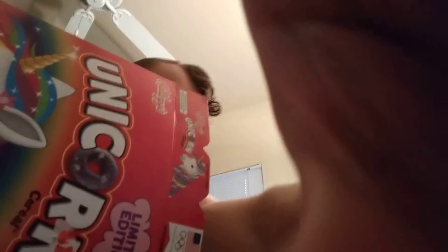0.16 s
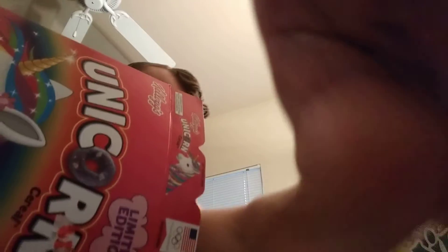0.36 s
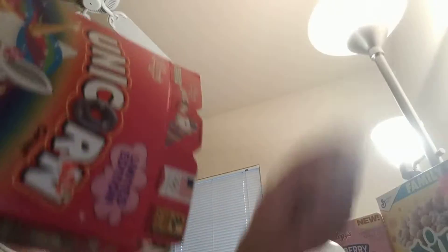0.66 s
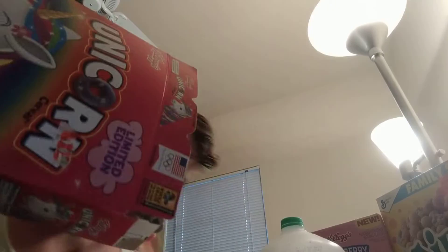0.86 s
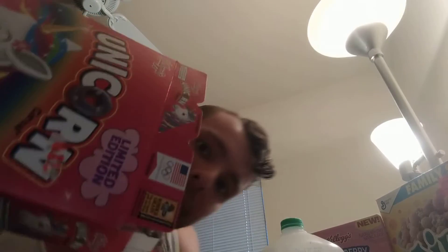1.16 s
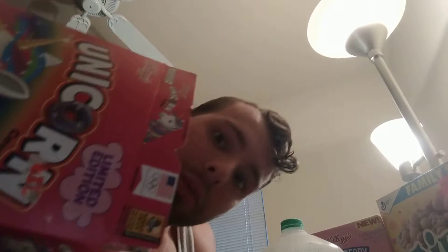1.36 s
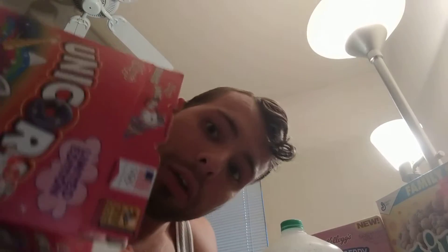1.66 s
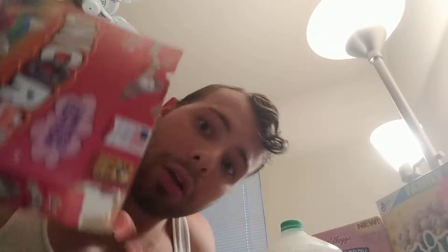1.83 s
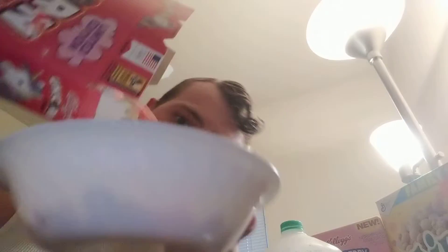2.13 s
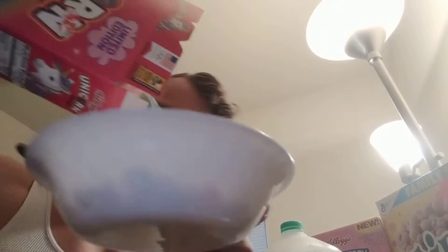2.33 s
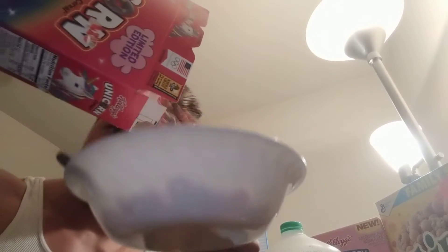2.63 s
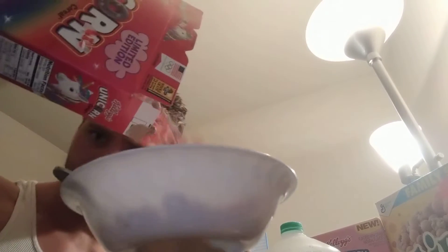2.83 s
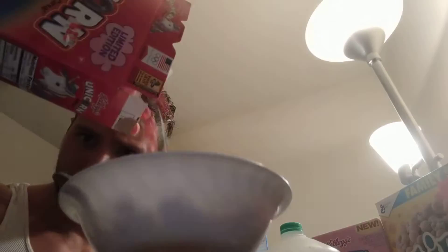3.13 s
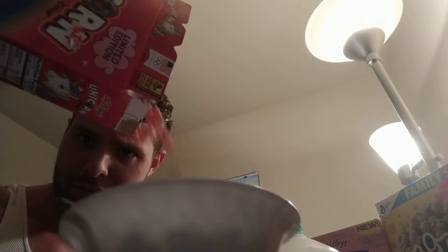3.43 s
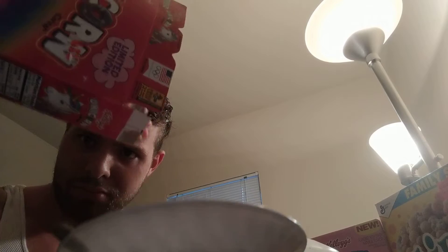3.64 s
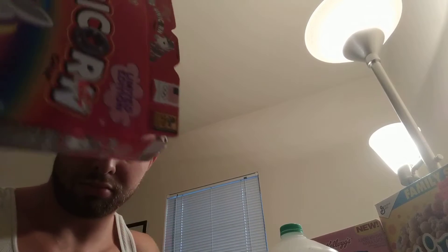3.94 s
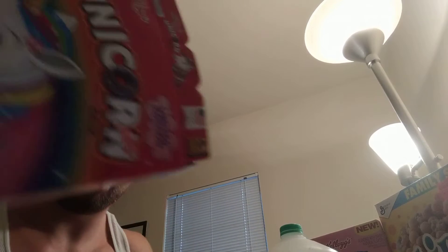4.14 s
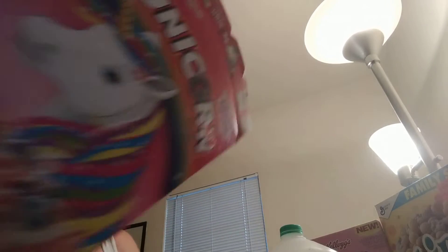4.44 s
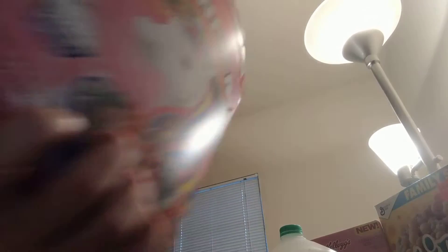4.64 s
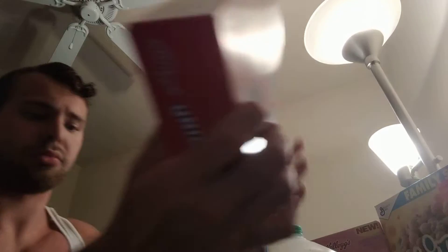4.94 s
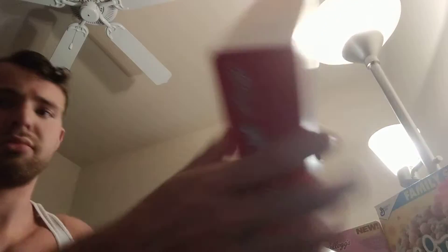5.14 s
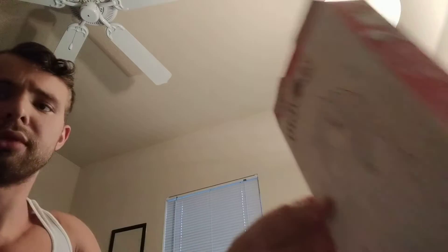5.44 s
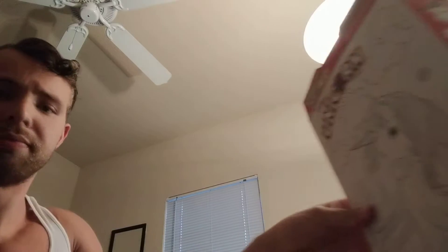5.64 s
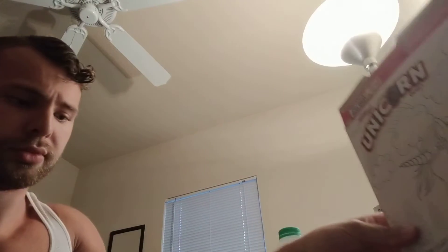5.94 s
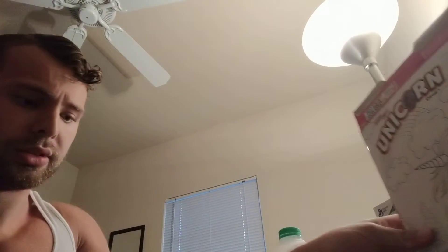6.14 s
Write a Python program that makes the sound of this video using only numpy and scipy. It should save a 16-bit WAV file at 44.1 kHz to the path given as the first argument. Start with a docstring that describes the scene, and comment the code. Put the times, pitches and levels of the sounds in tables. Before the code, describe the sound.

Close up in a small quiet room, dry cereal rings spill in bright, clinking clumps into a hard bowl. The bowl is picked up with a brief clatter of spoon and loose rings, then a second pour lands on the heap and thins out. The box hits the table with one sharp knock and a duller bump, fingers tap and rub the cardboard, and a last dull thump follows. Phone microphone.

```python
"""Clumps of dry ring cereal spill into a ringing bowl, then spoon and rings clatter as the bowl is picked up.
A stream pours onto the heap and thins out, the liner bag crinkles, and the box lands with one sharp knock and
two duller bumps while a hand slides over the cardboard. Cereal is many tiny impacts sent through ringing bodies;
knocks are decaying tones plus a noise crack; hands and sliding are shaped grains and noise.
A small room, quiet air and a faint hum surround it all, picked up by a phone."""
import sys
import numpy as np
from scipy import signal
from scipy.fft import rfft, irfft
from scipy.io import wavfile

SR = 44100
rng = np.random.default_rng(int(sys.argv[2]) if len(sys.argv) > 2 else 0)


def wrap_up_sound(samples):
    """Save the sound to the file named by the first command line argument, as 16-bit audio."""
    columns = np.atleast_2d(samples).T
    # keep every value between -1 and 1, then stretch to whole-number steps
    tamed = np.clip(columns, -1, 1)
    steps = np.round(tamed * 32767).astype(np.int16)
    wavfile.write(sys.argv[1], SR, steps)


N = 277521
TIME = np.arange(N) / SR

# Table levels are relative: the functions below add gains of their own.
# colour of the room air: (f/Hz, level/dB)
AIR_COLOUR = [(25, -7), (70, 1.5), (120, -9), (200, 0), (600, -26), (2000, -23), (8000, -11), (16000, -36)]
HUM_HZ, HUM_DB = 119, -64

# tips of the box that set the cereal sliding: (peak t/s, level/dB, rise t/s, fall t/s)
BOX_TIPS = [(.03, -38, 0.84, 0.6), (.66, -47, 0.18, .08), (1.37, -52.5, 0.28, 1.4),
            (1.68, -51.5, 0.61, 0.39), (2.8, -40, 1.3, 1.11), (3.6, -47, 1.5, 0.41),
            (4.21, -55, 0.12, 0.088)]
# strokes of a hand over the cardboard: (peak t/s, level/dB, rise t/s, fall t/s, hiss minus rub before gain level/dB)
HAND_STROKES = [(4.68, -44, 0.47, 0.33, -9), (4.86, -49, 0.41, 0.31, -8), (5.249, -35.5, 0.19, .15, -13.5),
                (5.6, -45.5, 0.27, 0.44, -10), (5.84, -36, 0.52, 0.54, -13.5),
                (6.0, -41.5, 0.53, 0.47, -4.5)]
SWELL_DB = 20  # each rise and fall time above spans this many dB
HISS_LAG_S = 0.011  # the dry hiss of skin trails the rub
# colours of sliding cereal, rubbing hand and hissing skin: (f/Hz, level/dB)
SLIDE_COLOUR = [(71, -11), (120, -5.5), (151, -13), (188, -7.5), (458, -2), (718, 3), (1260, -11.5),
                (1490, -3.5), (1900, -17.5), (2200, -15.5), (2860, -11), (4840, -120)]
RUB_COLOUR = [(59, -32), (100, -12), (135, -5), (282, -5.5), (440, 0), (516, -1), (732, -0.5), (872, -8),
              (1010, -7), (1570, -9), (2130, -21.5), (2540, -16.5), (4500, -25.5), (5850, -54),
              (9900, -120)]
HISS_COLOUR = [(2000, -19), (3200, 6), (4400, 3.5), (5500, 7), (7300, 6), (10000, 0), (12500, -5),
               (16000, -10)]

# fingers tapping and flexing the cardboard, and the bright crack of the box landing at 4.62 s: (t/s, level/dB,
# length t/s, brightness f/Hz)
CARDBOARD_TAPS = [(4.455, -41, 0.015, 2790), (4.596, -33.5, .005, 9600), (4.623, -29, 0.016, 1960),
                  (4.697, -29.5, 0.011, 1510), (4.754, -34.5, 0.005, 3240), (4.836, -40.5, 0.015, 900),
                  (4.88, -36.5, 0.0086, 1490), (4.955, -36.5, 0.014, 6600), (5.03, -38.5, 0.0036, 3600),
                  (5.089, -41, 0.0041, 8400), (5.192, -36, 0.011, 5870), (5.229, -36, 0.048, 2950),
                  (5.375, -38, 0.019, 2270), (5.442, -35.5, .006, 2980), (5.566, -35.5, 0.0019, 14000),
                  (5.772, -26, 0.0055, 2010), (6.012, -27, 0.019, 3630), (6.104, -34, .0013, 14000)]
# soft low thuds of handling: (t/s, level/dB, length t/s)
SOFT_THUDS = [(0.162, -43, 0.024), (.33, -48.5, 0.11), (1.379, -47, 0.13), (4.26, -51, 0.026),
              (4.701, -39.5, 0.14), (4.841, -40.5, 0.13), (5.83, -41, 0.043)]
# colours of the taps and thuds: (f/Hz, level/dB)
TAP_COLOUR = [(100, 5.5), (400, 15.5), (750, 15.5), (1500, 9.5), (2200, 1.5), (3600, 7.5), (7000, 6),
              (10000, 3), (16000, 4)]
THUD_COLOUR = [(25, -16), (65, -9.5), (120, -4.5), (200, -7), (400, -11), (1000, -49), (3000, -101)]

# the liner bag crinkles as the box is righted: (t/s, level/dB, length t/s)
LINER_CRINKLES = [(3.996, -56, .025), (4.122, -47.5, 0.032)]
# colour of the liner plastic: (f/Hz, level/dB)
LINER_COLOUR = [(1500, -8), (4000, 3), (8000, 2), (13000, -1), (16000, -10)]

# blows of the box on the table: (t/s, level/dB, contact brightness f/Hz, rebound delay t/s, rebound level/dB)
BOX_KNOCKS = [(4.481, -3.5, 11000, 0.016, -12.5), (4.62, -12.5, 356, 0.012, 4),
              (6.008, -4.5, 186, 0.049, -10)]
# ringing tones of box and table: (f/Hz, level/dB, time to fall 60 dB t/s)
TABLE_MODES = [(88, -32, 1), (113.2, -22.5, 0.58), (135, -16.5, 0.12), (190.2, -12, 0.27),
               (255, -23.5, 0.17), (324, 0.5, 0.026), (400, -36, 0.026), (770, -30, 0.044),
               (1240, -13, 0.023), (1444, -9, 0.017)]
# colour of the cardboard crack in each knock: (f/Hz, level/dB)
KNOCK_COLOUR = [(60, -49), (200, -17), (500, 14), (900, 1), (1200, 4.5), (1650, -7), (2200, -15.5),
                (3100, -11.5), (5000, -12.5), (8500, -17), (12000, -16.5), (16000, -34)]

# clumps landing in the standing bowl, plus a few strays after the pour: (t/s, level/dB, length t/s)
SPILL_CLUMPS = [(.0209, -15, 0.0034), (.0552, -13, 0.015), (.0854, -21, 0.0068), (.0944, -13, .003),
                (.1124, -19, 0.011), (.1482, -19, 0.0026), (.1889, -13.5, 0.01), (.2064, -22, 0.04),
                (.2666, -14.5, .003), (.2805, -23, 0.0063), (.3066, -27, .014), (.3284, -25, 0.021),
                (.3589, -15.5, 0.0075), (.3724, -25, 0.022), (.4069, -22, 0.0094), (.4439, -29, 0.0066),
                (.4608, -21.5, 0.0019), (.5024, -32, 0.011), (.6096, -30, 0.0095), (.7139, -20, .0025),
                (.7313, -22.5, 0.016), (.7491, -20, 0.0053), (.7811, -18, .017), (.8105, -19.5, 0.0071),
                (.8494, -33.5, .01), (1.1265, -25, 0.012), (1.2064, -33, .0023), (1.2569, -42.5, 0.019),
                (1.3339, -42.5, 0.0075), (4.0015, -42, 0.0072), (4.0627, -30, 0.003), (4.2434, -47, .0035)]
# spoon and loose rings clattering as the bowl is picked up: (t/s, level/dB, length t/s)
CLATTER_CLUMPS = [(1.4384, -19.5, 0.0048), (1.5534, -18.5, 0.0083), (1.5678, -20.5, 0.011),
                  (1.6024, -27, 0.011), (1.6301, -17.5, 0.0058), (1.6424, -25.5, 0.03),
                  (1.6827, -21, 0.0166), (1.7182, -17, 0.0053), (1.7305, -23, 0.03), (1.7834, -27, 0.026),
                  (1.8839, -23, 0.014), (2.0328, -23, 0.0085), (2.0727, -31.5, 0.02)]
# clumps landing on the heap in the lifted bowl: (t/s, level/dB, length t/s)
POUR_CLUMPS = [(2.1674, -20, 0.013), (2.2084, -24.5, 0.033), (2.2384, -27.5, 0.019), (2.2634, -22.5, 0.02),
               (2.2962, -24.5, 0.036), (2.3532, -28, 0.02), (2.393, -24.5, 0.0073), (2.4354, -24, 0.02),
               (2.4844, -22.5, 0.0097), (2.5124, -22.5, 0.036), (2.5605, -24, 0.026), (2.591, -21, .021),
               (2.6805, -32, 0.019), (2.7072, -15.5, 0.0042), (2.818, -23, .013), (2.8605, -25, 0.029),
               (2.9066, -15.5, 0.0028), (2.9376, -23, 0.017), (3.0179, -22.5, 0.0089),
               (3.0862, -23, 0.0034), (3.1418, -27, 0.0036), (3.2371, -26.5, 0.0044),
               (3.256, -24.5, 0.0071), (3.3205, -28.5, 0.0029), (3.3499, -28, 0.0052), (3.7, -37, 0.036),
               (3.782, -39.5, 0.0047)]
# stream of single rings between the clumps, in each of the three stages: (t/s, level/dB)
SPILL_FLOW = [(0.0, -25.5), (0.27, -21.5), (0.45, -28.5), (0.68, -38.5), (0.874, -34.5), (1.274, -66),
              (1.33, -59)]
CLATTER_FLOW = [(1.5, -38), (1.596, -29), (1.678, -36.5), (2.1, -39)]
POUR_FLOW = [(2.17, -31.5), (2.368, -33), (2.766, -25.5), (3.284, -34), (3.38, -36), (3.564, -37.5),
             (3.91, -46)]
# resonances of the free bowl, widths before extra damping: (f/Hz, width f/Hz, level/dB)
BOWL_MODES = [(1312, 79, 4), (1795, 32, 7), (3355, 82, 10.5), (4740, 160, -5.5), (5323, 104, 8),
              (7345, 60, 11), (7490, 43, 11.5), (8270, 230, 6), (9070, 95, 9), (9680, 96, 7.5),
              (10500, 79, 6.5), (11750, 100, 0.5), (13700, 48, -2)]
# resonances of the spoon lying in the bowl, widths before extra damping: (f/Hz, width f/Hz, level/dB)
SPOON_MODES = [(1950, 180, -4.5), (2110, 130, 0.5), (3910, 300, 4.5), (4360, 85, -17), (4870, 280, -17),
               (6680, 140, 1.5), (6320, 100, 8), (7500, 120, -2), (8090, 320, 5.5), (9500, 54, 5.5),
               (11100, 84, -8)]
# resonances of the bowl held and full, widths before extra damping: (f/Hz, width f/Hz, level/dB)
HEAP_MODES = [(3380, 86, 8.5), (3920, 110, 6.5), (5236, 61, 18.5), (6570, 100, 1), (7400, 115, 10),
              (7720, 63, 3), (8190, 49, 18), (8820, 300, 3.5), (9620, 54, 10), (10480, 65, 3.5),
              (11640, 100, 1.5), (13430, 75, -1)]
# each clump drives the resonance nearest one of these hardest, by chance: (f/Hz)
BOWL_SPOTS_HZ = (7395, 8190, 9620)
SPOON_SPOTS_HZ = (2070, 2180, 3930)
HEAP_SPOTS_HZ = (3920, 5270, 7360, 9570)
# colour of one dry ring cracking: (f/Hz, level/dB)
CRACK_COLOUR = [(100, -28.5), (300, 1), (750, -15), (1400, -3), (2200, -1.5), (3200, 0), (5000, 5.5),
                (8000, 2), (10000, -8.5), (12500, -7.5), (16000, -19)]
# a clump's treble above 6 kHz against the rest, before the hard-hit boost: (t/s, level/dB)
CLUMP_TREBLE = [(.06, 8), (.4, 6.5), (.8, 3), (1.12, -6.5), (1.7, -5.5), (2.2, -0.5), (2.7, 2), (3.3, 4),
                (4.0, -5)]
SINGLE_HIT_S = 0.0048  # the shorter a clump is against this, the more it acts as one hard hit
HARD_HIT_TREBLE_DB = 2  # most extra treble that a hard hit can get

TOP_HZ = 15900  # upper limit of the phone


def undb(db):
    """Turn decibels into gain."""
    return 10 ** (np.asarray(db) / 20)


def unit(x):
    """Scale to an rms level of 1."""
    return x / np.sqrt(np.mean(x ** 2) + 1e-18)


def fade(t, t60):
    """Exponential decay, 60 dB down after t60 seconds."""
    return np.exp(-np.log(1000) * t / t60)


def curve(rows):
    """Gain along a level curve, fading to silence outside it."""
    s, db = np.transpose(rows)
    outside = np.abs(TIME - np.clip(TIME, s[0], s[-1]))
    return undb(np.interp(TIME, s, db)) * fade(outside, 0.1)


def swells(rows):
    """Gain of movements that each grow steadily in dB to a peak and die away."""
    power = 0
    for s, db, rise, fall in rows:
        distance = np.maximum((s - TIME) / rise, (TIME - s) / fall)
        power = power + undb(db - SWELL_DB * distance) ** 2
    return np.sqrt(power)


def walk(rate):
    """Slow random wander through rate new values a second, with a spread near 1."""
    knots = np.arange(0, TIME[-1] + 1, 1 / rate)
    return np.interp(TIME, knots, rng.standard_normal(len(knots)))


def add(out, s, x):
    """Mix x into out, starting at s seconds."""
    i = max(int(s * SR), 0)
    out[i:i + len(x)] += x[:max(N - i, 0)]


def through(x, response):
    """Let x excite a body that has this impulse response."""
    return signal.fftconvolve(x, response)[:len(x)]


def lowpass(x, hz):
    """Gentle second-order low-pass."""
    return signal.sosfilt(signal.butter(2, min(hz, SR / 3), fs=SR, output="sos"), x)


def colour(points, size=4096):
    """Impulse response with the given spectrum, all its energy as early as possible (minimum phase)."""
    hz, db = np.transpose(points)
    f = np.maximum(np.arange(size // 2 + 1) * SR / size, 1)
    log_gain = np.log(undb(np.interp(np.log(f), np.log(hz), db)))
    cepstrum = irfft(log_gain)
    # folding the second half onto the first leaves no sound before the hit
    cepstrum[1:size // 2] *= 2
    cepstrum[size // 2 + 1:] = 0
    return irfft(np.exp(rfft(cepstrum)))


def grains(n, rate, spread_db):
    """Random tiny impacts, about rate a second, many weak and a few strong, pushing either way."""
    happens, size, sign = rng.random((n, 3)).T
    strength = undb(-spread_db * np.log(np.maximum(size, 0.01)))
    return (happens < rate / SR) * strength * np.sign(sign - 0.5)


def burst(db, length, response, rate, spread_db, release, first=4.0, size=9000):
    """A first contact and a crowd of smaller ones that lasts for length seconds, then dies away."""
    t = np.arange(size) / SR
    envelope = np.exp(-0.6 * t / length) * fade(np.maximum(t - length, 0), release)
    push = unit(grains(size, rate, spread_db)) * envelope
    push[0] += first
    sound = through(push, response)
    loudness = np.sqrt(np.mean(sound[t < length] ** 2))
    return sound * undb(db) / loudness


def background():
    """Quiet room air is coloured noise that wavers in level; the faint mains hum is one steady tone."""
    air = unit(through(rng.standard_normal(N), colour(AIR_COLOUR))) * undb(walk(12))
    hum = np.sqrt(2) * np.sin(2 * np.pi * HUM_HZ * TIME)
    return undb(-60) * air + undb(HUM_DB) * hum


def room(x, wet_db, t60, treble_t60):
    """A small room adds a diffuse noise-like tail, with separate decay times for lows and treble."""
    t = np.arange(SR) / SR
    noise = rng.standard_normal(SR)
    low = signal.sosfilt(signal.butter(1, 2500, fs=SR, output="sos"), noise)
    tail = low * fade(t, t60) + (noise - low) * fade(t, treble_t60)
    tail *= np.clip(t / 0.0053 - 0.5, 0, 1)  # a short gap, then the tail builds up
    return x + undb(wet_db) * through(x, tail / np.sqrt(np.sum(tail ** 2)))


def stroking():
    """Skin sticks and slips on the cardboard as a crowd of small jerks, followed by a dry hiss."""
    slips = grains(N, rate=2200, spread_db=3.0) * undb(2.5 * walk(45))
    rub = swells([row[:4] for row in HAND_STROKES])
    hiss = swells([(s + HISS_LAG_S, db + hiss_db, rise, fall) for s, db, rise, fall, hiss_db in HAND_STROKES])
    out = undb(2.7) * rub * unit(through(slips, colour(RUB_COLOUR)))
    return out + hiss * unit(through(rng.standard_normal(N), colour(HISS_COLOUR)))


def taps_and_thuds():
    """Fingers tap the cardboard in short bursts, the cardboard cracks brightly as the box lands, and the box
    thuds low and softly in the grip."""
    out = np.zeros(N)
    for s, db, length, bright_hz in CARDBOARD_TAPS:
        contact = lowpass(colour(TAP_COLOUR), bright_hz)
        add(out, s, burst(db, length, contact, rate=3700, spread_db=3.5, release=0.029))
    for s, db, length in SOFT_THUDS:
        add(out, s, burst(db, length, colour(THUD_COLOUR), rate=1000, spread_db=0, release=0.25))
    return out


def liner():
    """The plastic bag inside the box crinkles in short bursts of tiny snaps."""
    out = np.zeros(N)
    for s, db, length in LINER_CRINKLES:
        crinkle = burst(db, length, colour(LINER_COLOUR), rate=2700, spread_db=1, release=0.12, first=2)
        add(out, s, crinkle)
    return out


def knocks():
    """The box lands and rebounds: box and table boom and ring under a crack of cardboard."""
    out, t = np.zeros(N), np.arange(SR) / SR
    ring = sum(undb(db) * np.sin(2 * np.pi * hz * t) * fade(t, t60) for hz, db, t60 in TABLE_MODES)
    # the ring is kept out of the deep bass
    ring = signal.sosfilt(signal.butter(2, 85, "high", fs=SR, output="sos"), ring)
    for s, db, bright_hz, rebound, rebound_db in BOX_KNOCKS:
        crack_decay = fade(t, 0.022) + undb(-16) * fade(t, 0.063)
        crack = through(rng.standard_normal(SR) * crack_decay, colour(KNOCK_COLOUR))
        blow = undb(db) * lowpass(ring + undb(5.5) * crack, bright_hz)  # a softer contact is duller
        add(out, s, blow)
        add(out, s + rebound, undb(rebound_db) * blow)
    return out


def flow(strength, thinning, lumpiness_db):
    """Share of the full landing rate (a weak stream breaks into single rings) and its random lumps."""
    share = np.clip((strength / strength.max()) ** thinning, 0.2, 1)
    return share, undb(lumpiness_db * walk(40))


def sliding():
    """Rings tumble along the cardboard and drum its hollow inside."""
    strength = swells(BOX_TIPS)
    share, lumps = flow(strength, thinning=0.1, lumpiness_db=4.5)
    tumble = grains(N, share * lumps * 1300, spread_db=2.0) / np.sqrt(share)
    return undb(5) * strength * unit(through(tumble, colour(SLIDE_COLOUR)))


def body(resonances, crack_db, damping, scatter_db, crumble_t60=0.014, size=3000):
    """Response to a ring landing: its own brittle crack plus resonances, weighted by where it lands."""
    t = np.arange(size) / SR
    crumble = rng.standard_normal(size) * fade(t, crumble_t60)
    crack = through(crumble / np.linalg.norm(crumble), colour(CRACK_COLOUR, size=512))
    response = undb(crack_db) * crack
    landing = rng.standard_normal((len(resonances), 2))
    for (hz, width, db), (place, turn) in zip(resonances, landing):
        # a wider resonance dies sooner
        ring = np.exp(-np.pi * width * damping * t) * np.cos(2 * np.pi * hz * t + turn)
        weight = undb(db + scatter_db * place) * 2 * np.pi * width * np.sqrt(damping) / SR
        response = response + weight * ring
    return response


def favour(resonances, struck_hz, favour_db):
    """The landing spot drives the resonance nearest struck_hz harder."""
    modes = np.array(resonances, float)
    modes[np.argmin(np.abs(modes[:, 0] - struck_hz)), 2] += favour_db
    return modes


def brighten(x, treble_db, length):
    """Set treble against the rest as a harder or softer contact would, keeping the early energy."""
    low = signal.sosfiltfilt(signal.butter(3, 6000, fs=SR, output="sos"), x, padtype=None)
    treble = x - low
    head = slice(int(max(length, 0.004) * SR))
    treble_share = 1 / (1 + undb(-2 * treble_db))  # share of energy
    low_part = np.sqrt(1 - treble_share) * low / np.linalg.norm(low[head])
    treble_part = np.sqrt(treble_share) * treble / np.linalg.norm(treble[head])
    return np.linalg.norm(x[head]) * (low_part + treble_part)


def clumps(rows, resonances, spots_hz, gain_db, crack_db, favour_db, rate, release):
    """Each clump is a tight burst of impacts; the shortest are nearly one hard hit that damps the ring."""
    out = np.zeros(N)
    for (s, db, length), spot in zip(rows, rng.random(len(rows))):
        single = np.exp(-length / SINGLE_HIT_S)  # near 1 for one hard hit, near 0 for a long clump
        modes = favour(resonances, spots_hz[int(spot * len(spots_hz))], favour_db)
        response = body(modes, crack_db + 2 * single, damping=1.38 + 1.3 * single, scatter_db=3.0)
        first = 3 + 50 * single ** 2
        sound = burst(db + gain_db, length, response, rate, spread_db=2.5, release=release, first=first)
        treble_db = np.interp(s, *np.transpose(CLUMP_TREBLE)) + HARD_HIT_TREBLE_DB * single
        add(out, s, brighten(sound, treble_db, length))
    return out


def trickle(levels, resonances, crack_db, rate, spread_db, count=24):
    """A rain of single rings on several spots of one body, each spot with its own colour."""
    strength = curve(levels)
    share, lumps = flow(strength, thinning=0.45, lumpiness_db=4.5)
    spots = [body(resonances, crack_db, damping=2.2, scatter_db=7) for _ in range(count)]
    spot_rate = share * lumps * rate / count
    rain = sum(through(grains(N, spot_rate, spread_db), unit(spot)) for spot in spots)
    return strength * unit(rain / np.sqrt(share))


def cereal():
    """Clumps and a trickle of single rings strike the bowl, the spoon and the heap, making each ring."""
    out = clumps(SPILL_CLUMPS, BOWL_MODES, BOWL_SPOTS_HZ, gain_db=1.0, crack_db=-13.0,
                 favour_db=4, rate=5500, release=0.059)
    out += clumps(CLATTER_CLUMPS, SPOON_MODES, SPOON_SPOTS_HZ, gain_db=-2.5, crack_db=-18,
                  favour_db=3, rate=2700, release=0.12)
    out += clumps(POUR_CLUMPS, HEAP_MODES, HEAP_SPOTS_HZ, gain_db=-1.5, crack_db=-7,
                  favour_db=10.5, rate=2700, release=0.064)
    out += undb(-5.0) * trickle(SPILL_FLOW, BOWL_MODES, crack_db=-1, rate=1600, spread_db=3.0)
    out += undb(-3) * trickle(CLATTER_FLOW, SPOON_MODES, crack_db=6, rate=1500, spread_db=3.0)
    out += undb(-3.0) * trickle(POUR_FLOW, HEAP_MODES, crack_db=3.5, rate=1100, spread_db=1.0)
    return out


def scene():
    """Hands, box and cereal in the room, over the background."""
    near = stroking() + taps_and_thuds() + liner() + knocks() + sliding() + cereal()
    return (background() + room(near, wet_db=-10.0, t60=0.2, treble_t60=0.22))[None]


def record(dry):
    """The phone rounds the loudest peaks and cuts the deep bass and the top."""
    rounded = 0.79 * np.tanh(dry / 0.82)
    thin = signal.sosfilt(signal.butter(4, 55, "high", fs=SR, output="sos"), rounded)
    return signal.sosfilt(signal.ellip(8, 0.2, 70, TOP_HZ, fs=SR, output="sos"), thin)


dry = scene()
out = record(dry)
wrap_up_sound(out)
```